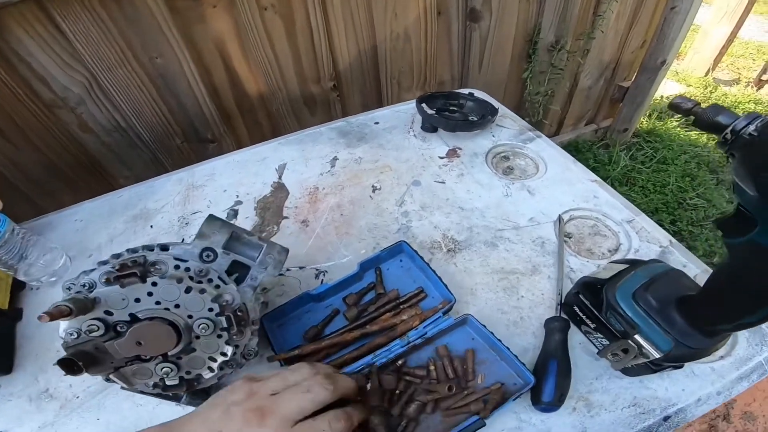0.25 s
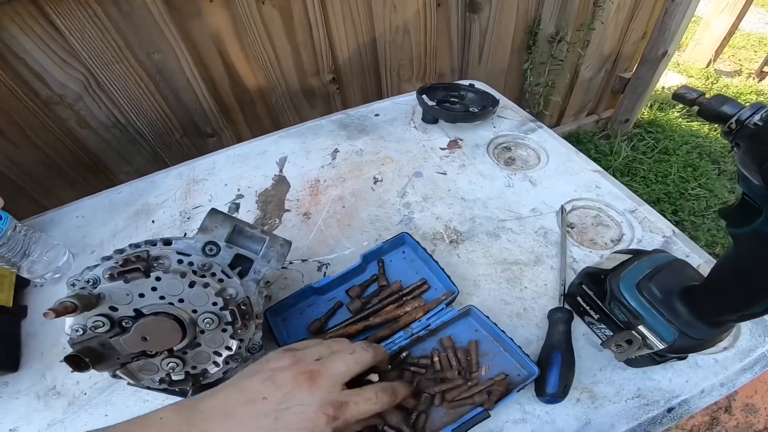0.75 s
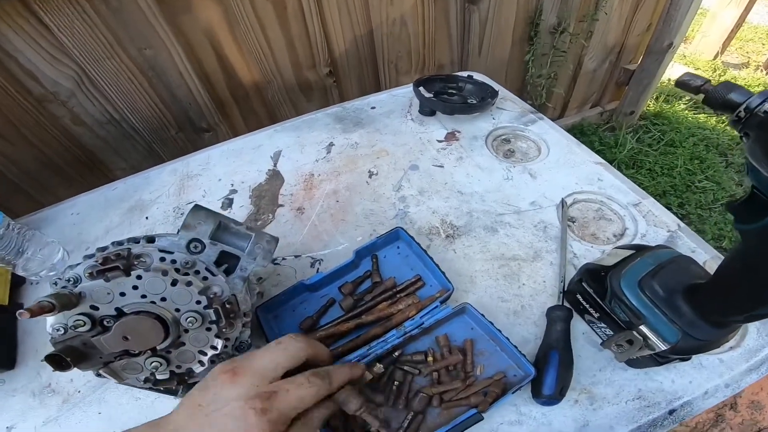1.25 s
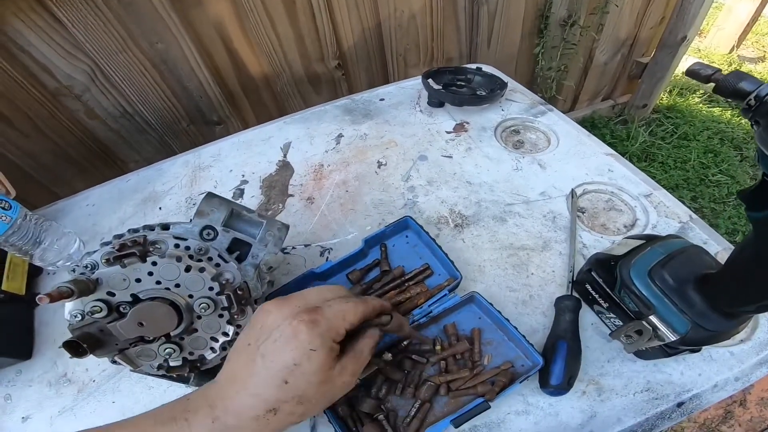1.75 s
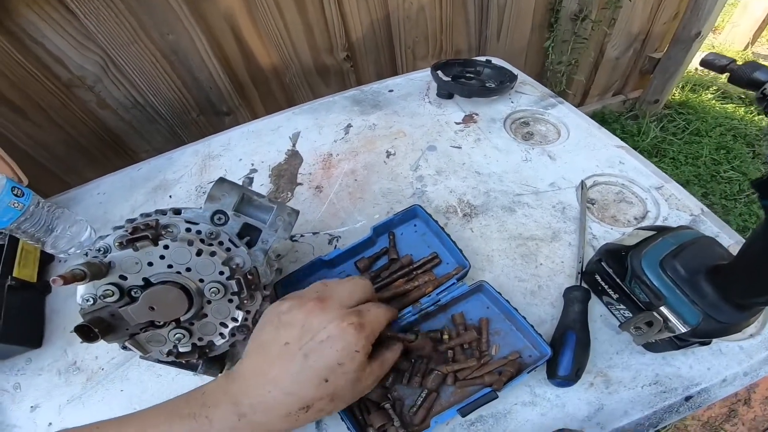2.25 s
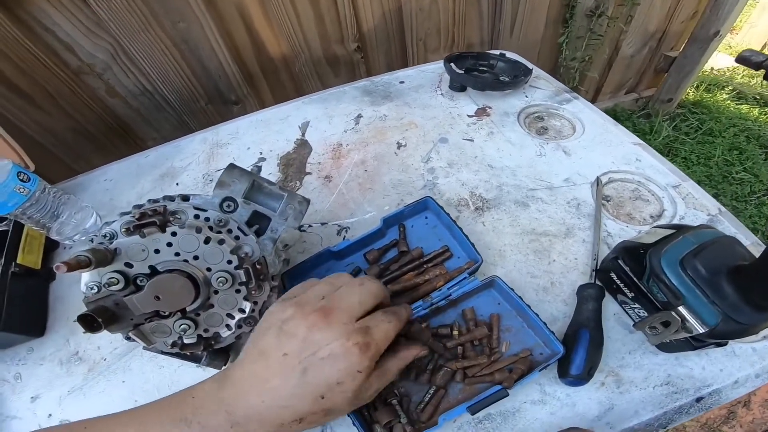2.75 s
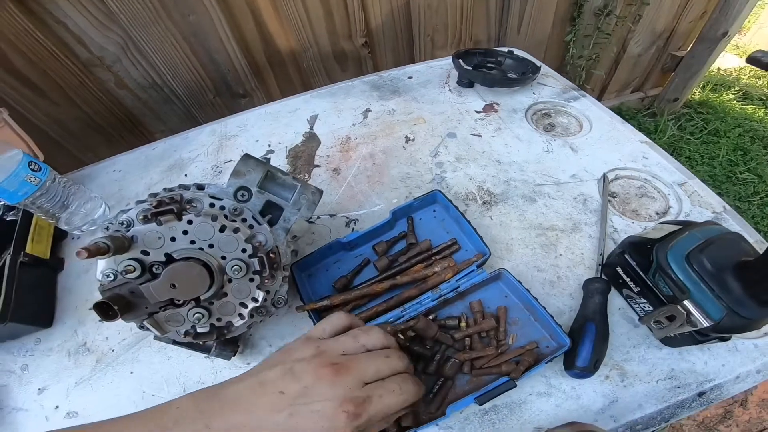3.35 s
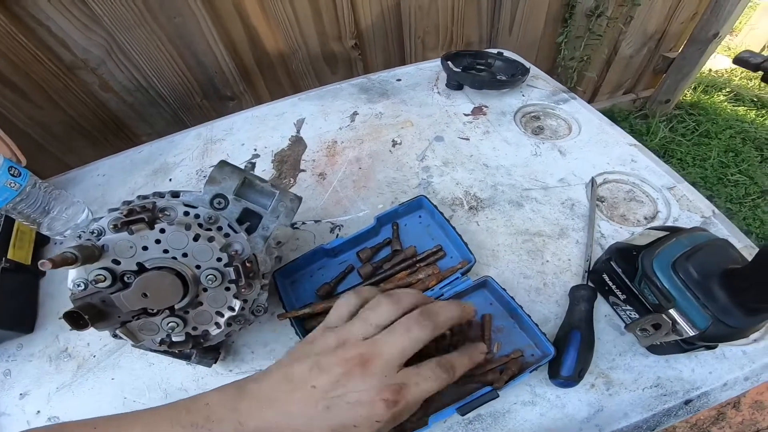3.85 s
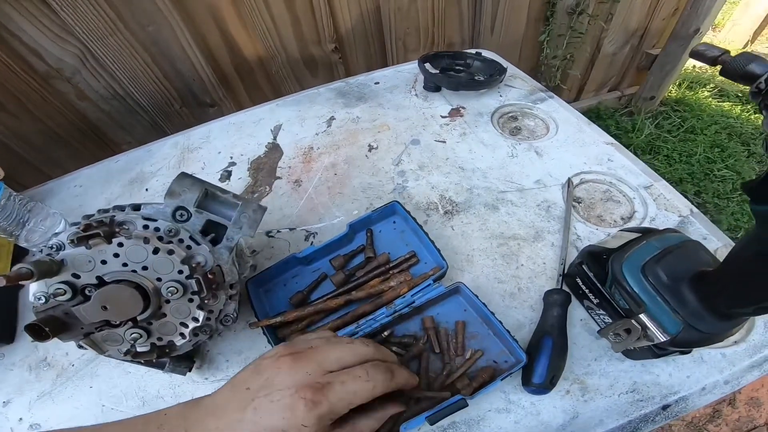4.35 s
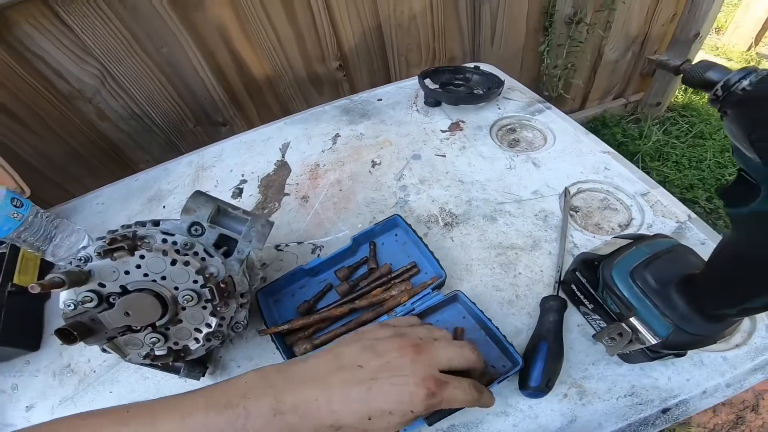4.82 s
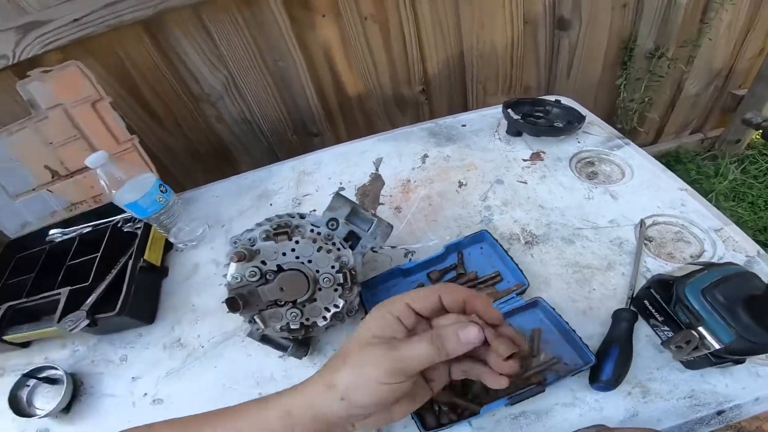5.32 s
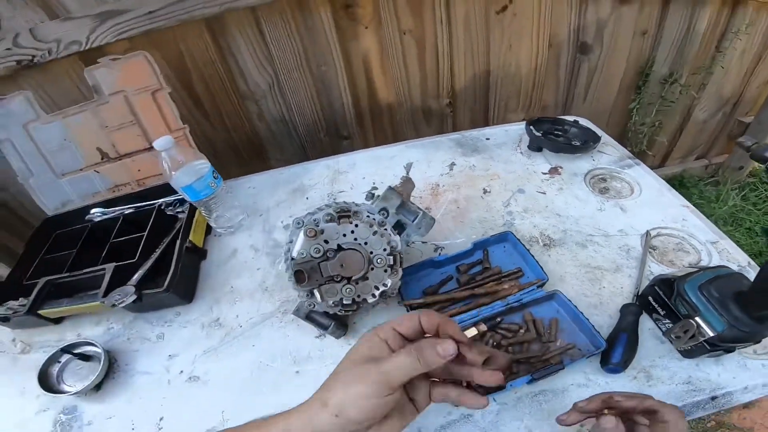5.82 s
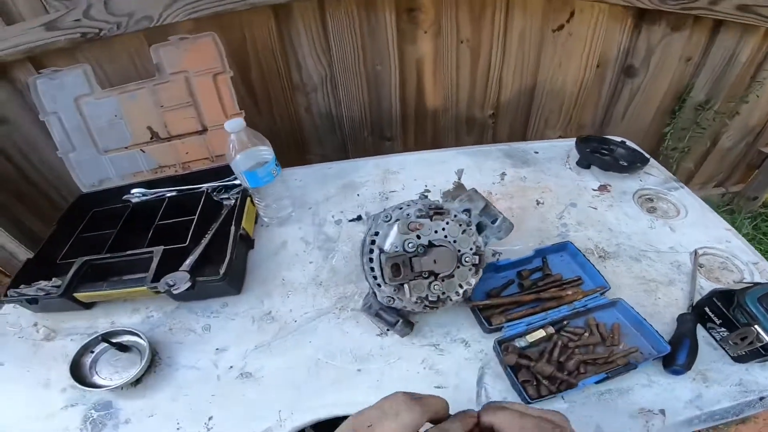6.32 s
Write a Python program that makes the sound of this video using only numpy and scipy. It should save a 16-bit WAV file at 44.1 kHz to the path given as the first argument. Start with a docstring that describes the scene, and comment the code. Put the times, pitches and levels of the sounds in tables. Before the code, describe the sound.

Small metal bits clatter and slide around in a plastic box on an outdoor table as someone sorts through them close by. The clinking comes in busy clusters, thins briefly, then picks up again before stopping. Meanwhile a far-off propeller aircraft swells from a faint hum to a steady, slowly falling drone with a low rumble. Thin, very high insect chirps repeat quietly behind it all.

```python
"""Loose steel bits knock, scrape and ping as a hand rummages in a plastic case on a garden table.
Impacts and friction excite the resonances of case and table, and struck bits ring in their own modes.
A propeller aircraft drones past, its note sinking. An insect buzzes in short chirps of wing strokes.
A distant rumble and rush of air swell and brighten as the aircraft nears."""
import sys
import numpy as np
from scipy import signal
from scipy.fft import rfft, irfft, next_fast_len
from scipy.io import wavfile
from scipy.ndimage import uniform_filter1d, map_coordinates

SR = 44100
rng = np.random.default_rng(int(sys.argv[2]) if len(sys.argv) > 2 else 0)


def put_to_file(sound):
    """Save the sound as 16-bit audio at rate SR, in the file named by the first command-line argument."""
    columns = np.atleast_2d(sound).T  # one column per channel
    safe = np.clip(columns, -1, 1)
    whole_steps = np.round(safe * 32767)
    wavfile.write(sys.argv[1], SR, whole_steps.astype(np.int16))


N = 290001

# Blows on the case. Each row: start in seconds, level in dB, colour in Hz,
# relative treble in dB, table thud in dB.
KNOCKS = [(.0034, -12, 2610, -2, -38), (.0154, -10, 4900, -21, -20), (0.046, -22, 2760, -27.5, -40),
          (0.0727, -21.5, 2280, 8, -40), (0.0825, -11.5, 3430, -23, -16.5), (.0978, -14, 2070, -11, -40),
          (0.1242, -10, 2210, -25, -40), (0.161, -17, 2020, -3, -40), (.186, -24, 2950, -30, -40),
          (.198, -22, 2300, -30, -40), (.2279, -21, 2040, -37.5, -40), (.2443, -23, 1534, -20, -40),
          (0.2519, -10.5, 2200, -3.5, -25), (0.2586, -15, 2810, -23, -40), (0.2715, -12.5, 2170, -15, -40),
          (0.334, -13.5, 3140, -42, -40), (0.3659, -14.5, 2590, -8.5, -43), (.433, -21.5, 3020, -1, -31),
          (0.4736, -10, 2620, -39.5, -36), (0.497, -26, 2060, -35, -40), (.571, -28.5, 2730, -8, -40),
          (.618, -19.5, 1800, -26, -42), (0.6386, -25.5, 1470, -14, -38), (0.6987, -11, 3330, -18, -40),
          (0.7843, -13, 2380, -14, -40), (0.8201, -16, 2940, 5, -22), (.8914, -18, 2960, -0.5, -37),
          (.957, -14, 1690, -4.5, -37), (.9677, -16.5, 2620, -18, -37), (.985, -27, 2300, -8, -40),
          (1.0031, -12, 2270, -40, -40), (1.0584, -24.5, 1420, -37, -40), (1.11, -22, 1480, -14.5, -29),
          (1.1423, -17.5, 2846, -25, -40), (1.1558, -7, 2960, -12.5, -40), (1.2333, -34, 2800, -4, -40),
          (1.3204, -7.5, 3246, -8.5, -16.5), (1.3485, -6.5, 3030, -38.5, -13),
          (1.3901, -18.5, 2130, -22.5, -40), (1.438, -30.5, 4880, 0, -38), (1.463, -26.5, 2100, -34, -40),
          (1.477, -14.5, 1600, -12.5, -40), (1.4943, -11, 2130, -15, -18), (1.5104, -17, 2405, -16.5, -40),
          (1.5453, -9.5, 2210, -21.5, -40), (1.6292, -14.5, 2800, -40, -25), (1.6432, -25, 2880, -42, -38),
          (2.161, -6.5, 2300, -14.5, -14), (2.1985, -20, 2570, -34, -40), (2.282, -38, 3300, -20, -40),
          (2.4593, -16.5, 2600, -30, -40), (2.632, -33, 2190, -30, -38), (2.6826, -19, 4940, -7, -40),
          (2.6931, -9, 2600, -25, -13.5), (2.8582, -29, 1960, -22, -28), (3.013, -35, 2200, -30, -40),
          (3.073, -24, 1620, -29, -40), (3.134, -25, 2500, -12, -40), (3.1596, -19, 2880, -12, -26),
          (3.1665, -16, 3000, -4, -35), (3.264, -22, 2400, -25, -24), (3.2725, -15, 1900, -20, -26),
          (3.345, -29, 2000, -4, -40), (3.3598, -27, 4900, -2.5, -40), (3.3903, -26, 2200, -5, -40),
          (3.438, -21.5, 4600, 1.5, -40), (3.496, -10.5, 2300, -33, -40),
          (3.6425, -13.5, 3420, -32.5, -24.5), (3.664, -25.5, 2000, -25, -40),
          (3.6956, -21.5, 2360, -44, -40), (3.8845, -16.5, 2120, -40, -40), (3.9168, -18.5, 2500, -20, -40),
          (3.933, -27, 3200, -2, -40), (4.008, -16, 1910, -37, -37), (4.0215, -14.5, 2850, -31, -40),
          (4.0475, -24, 3000, 3, -40), (4.0525, -13, 3000, -20, -40), (4.094, -19, 2020, -17, -43),
          (4.1069, -13.5, 3240, -13.5, -40), (4.132, -18, 2730, -10, -40), (4.2555, -13.5, 2820, -5.5, -40),
          (4.285, -31, 2900, -25, -40), (4.361, -21.5, 1510, -35, -40), (4.4287, -30, 1560, -18, -28),
          (4.4636, -30, 1550, -36, -40), (4.5135, -13, 1880, -41, -22), (4.5295, -21.5, 3000, -29, -42),
          (4.5495, -11, 3170, -15.5, -26), (4.626, -27.5, 1450, -8.5, -37), (4.6706, -27, 1360, -37, -42),
          (4.695, -28, 1300, -35, -40), (4.709, -28, 2100, -30, -40), (4.743, -29, 3000, -25, -40),
          (4.791, -13, 2090, -25, -30), (4.798, -15, 2900, -20, -32)]
# Spectra of the case and of steel on steel. Each row: frequency in Hz, relative density in dB.
CASE_SPECTRUM = [(300, -7), (600, -3.5), (1000, -4), (1500, 0), (2400, -3.5), (3100, -1.5), (4100, -6),
                 (5200, -11), (7000, -25), (12000, -41), (16000, -96.5)]
STEEL_SPECTRUM = [(3000, -34.5), (5000, -0.5), (9700, -4.5), (11200, -12.5), (13000, -24), (16000, -50.5)]
def knocks():
    """Impact excitation: a few quick contacts make the case rattle and the steel crack."""
    hard_db, hard_t60_s, skid_s_per_db = -5, .024, .0008  # softer knocks skid longer
    crest_db, snap_db, snap_t60_s = 5, -4, .004
    body, crack = np.zeros((2, 2, N + SR))
    t = np.arange(SR // 12) / SR
    decay = lambda t60: amp(-60 * t / t60) * (1 - np.exp(-t / .00054))
    for start, db, hz, treble_db, _ in KNOCKS:
        t60 = max(hard_t60_s + skid_s_per_db * (hard_db - db), .008)
        chatter = amp(1.6 * rocking(len(t), smoothing=50))
        chatter *= amp(db - crest_db) * np.linalg.norm(decay(t60)) / np.linalg.norm(chatter * decay(t60))
        shake = rng.standard_normal((2, 2, len(t))) * chatter
        envelope = amp(snap_db) * decay(snap_t60_s) + decay(t60) + amp(-19.5) * decay(3.58 * t60)
        add_at(body, start, panel(shake[0] * envelope, hz, width=.25))
        add_at(crack, start, amp(treble_db) * shake[1] * decay(.56 * t60))
    return colour(body[:, :N], CASE_SPECTRUM) + colour(crack[:, :N], STEEL_SPECTRUM)


# Modes of the case walls. Each row: frequency in Hz, bandwidth in Hz, relative gain in dB.
WALL_MODES = [(2010, 120, -6), (2680, 130, -5), (3150, 150, -8), (4450, 110, -2)]
def panel(x, hz, width):
    """Modal response: the touched spot colours the rattle, and each contact wakes the walls unequally."""
    woken = [(centre, band, db + 3 * rng.standard_normal()) for centre, band, db in WALL_MODES]
    walls = lambda f: 1 + sum(modes([mode])(f) for mode in woken)
    spot = modes([(hz, width * hz, 0), (1.5 * hz, width * hz, -6)])
    ring = lambda f: walls(f) * (.85 + spot(f))
    return filtered(x, lambda f: ring(f) / np.sqrt(np.mean(np.abs(ring(f[f < 6000])) ** 2)))


# Drags over the case. Each row: start and end in seconds, level in dB, relative treble in dB.
SCRAPES = [(0, 0.144, -30, -18), (.186, 0.305, -36, -30), (.561, 0.622, -35.5, -23),
           (0.645, 0.856, -34.5, -20.5), (.853, 0.955, -35.5, -27), (0.948, 1.093, -42.5, -29),
           (1.34, 1.461, -44, -24), (1.497, 1.582, -42, -23), (2.375, 2.451, -39, -11),
           (2.58, 2.62, -43, -12), (2.81, 2.87, -49, -15), (3.09, 3.18, -38, -18), (3.22, 3.317, -44, -21),
           (3.325, 3.475, -39, -16), (3.88, 3.956, -41, -12), (3.945, 4.053, -26.5, -15),
           (4.174, 4.251, -46, -20), (4.615, 4.78, -40.5, -28)]
def scrapes():
    """Sliding friction: bits cross ribs and each other in clumps of tiny contacts of random size."""
    contacts_per_s, slide_power = 650, .12
    contacts = rng.random(N) < contacts_per_s / SR
    sizes = np.minimum(rng.exponential(size=N), 2.6)
    ticks = contacts * amp(3.4 * sizes + 1.3 * wobble(50))
    grain = unit(np.sqrt(signal.lfilter([1], [1, -.97], ticks ** 2) + slide_power))
    shake = grain * rng.standard_normal((2, 2, N))
    body, crack = np.zeros((2, 2, N))
    for start, end, db, treble_db in SCRAPES:
        part = slice(round(start * SR), round(end * SR))
        stroke = amp(db) * signal.windows.tukey(part.stop - part.start, .4)
        colour_hz = 3000 + 47 * treble_db  # duller as the treble share falls
        body[:, part] += panel(stroke * shake[0][:, part], colour_hz, width=.51)
        crack[:, part] += amp(treble_db) * stroke * shake[1][:, part]
    table_hum = amp(13) * filtered(body[0], modes(TABLE_MODES))
    return colour(body, CASE_SPECTRUM) + colour(crack, STEEL_SPECTRUM) + table_hum * [[1], [0]]


# Modes of table and case floor. Each row: frequency in Hz, bandwidth in Hz, relative gain in dB.
TABLE_MODES = [(76, 37, 0.5), (162, 71, 2), (233, 60, 1.5), (303.4, 50, 5.5), (480, 150, -7)]
def thumps():
    """Impulse response: each knock pushes case floor and table, then the case settles in small jolts."""
    settle_db, settle_t60_s = -30, .07
    blows, t = np.zeros(N + SR), np.arange(SR // 16) / SR
    for start, *_, thud_db in KNOCKS:
        jolts = amp(settle_db - 60 * t / settle_t60_s) * rng.standard_normal(len(t))
        add_at(blows, start, amp(thud_db) * (signal.unit_impulse(len(t)) + jolts))
    thud = lambda f: modes(TABLE_MODES)(f) / (1 + 1j * f / 900) ** 2
    peak = np.abs(filtered(signal.unit_impulse(SR), thud)).max()
    return filtered(blows[:N], thud) / peak


# Ringing bits. Each row: start in seconds, level in dB, name of the bit, 60 dB decay time in seconds.
PINGS = [(.008, -27.5, "worn", .16), (.076, -26, "long", .12), (.162, -47.5, "thin", .13),
         (.162, -41, "short", .1), (.252, -24.5, "short", .16), (.28, -27.5, "short", .1),
         (.41, -44, "long", .045), (.571, -38, "long", .06), (0.638, -37.5, "long", .08),
         (.89, -33.5, "long", 0.066), (.899, -43, "short", .13), (.965, -40.5, "short", .14),
         (.96, -45.5, "thin", .06), (1.11, -28.5, "long", .042), (1.111, -37.5, "stout", .1),
         (1.235, -38.5, "long", .18), (1.321, -30, "long", .08), (1.39, -38, "long", .047),
         (1.438, -35, "long", .066), (1.438, -44, "stout", .11), (1.46, -38, "long", .043),
         (1.492, -48, "short", .3), (2.683, -44, "short", .13), (3.361, -30, "long", .05),
         (3.362, -26, "stout", .041), (3.439, -28.5, "long", .054), (3.439, -22, "stout", .045),
         (3.44, -49.5, "thin", .09), (3.644, -23, "long", .08), (4.014, -44, "short", .17),
         (4.048, -20.5, "short", .047), (4.06, -43.5, "long", .39), (4.203, -38, "long", .035),
         (4.565, -47, "long", .14), (3.675, -42, "stout", .04)]
# Modes of each named bit. Each row: frequency in Hz, relative level in dB.
BIT_MODES = {"long": [(9396, 0), (14600, -24)], "stout": [(4815, 0)], "short": [(11967, 0), (12105, -10)],
             "thin": [(15237, 0)], "worn": [(11661, 0), (12333, -4)]}
def pings():
    """Damped free vibration: struck bits ring on, roughened and damped by what they touch."""
    out, t = np.zeros((2, N + SR)), np.arange(SR // 3) / SR
    for start, db, bit, t60 in PINGS:
        for hz, mode_db in BIT_MODES[bit]:
            phase = rng.uniform(0, 2 * np.pi, (2, 1)) + np.cumsum(rng.normal(0, .055, len(t)))
            rough_db = 3.5 * rocking(len(t), smoothing=300)
            envelope = amp(db + mode_db + rough_db - 60 * t / t60) * (1 - np.exp(-t / .0003))
            add_at(out, start, envelope * np.sin(2 * np.pi * hz * t + phase))
    return out[:, :N] * amp([[-5], [2]])


# Pitch of the propeller. Each row: time in seconds, blade note in Hz.
BLADE_PITCH = [(0, 112.4), (2, 110.7), (3.9, 108), (4.9, 105.2), (5.7, 99.67), (6.58, 93.65)]
# Strength of the blade note and of its octave. Each row: time in seconds, level in dB.
NOTE_LEVEL = [(0, -52), (.5, -47), (1.3, -38), (1.7, -39.5), (2.2, -30.5), (2.65, -26), (2.8, -30),
              (3.5, -23.5), (3.8, -17), (4.05, -19.5), (4.25, -24), (4.6, -30.5), (4.82, -19.5), (5.1, -20),
              (5.35, -13), (5.7, -17), (6.3, -18.5), (6.58, -20.5)]
OCTAVE_LEVEL = [(0, -57), (3, -51.5), (4.2, -42.5), (5, -33.5), (5.5, -41), (6.2, -31.5), (6.58, -37.5)]
def aircraft():
    """Amplitude and phase modulation: the blade note and its octave flutter in turbulent air."""
    phase = 2 * np.pi * np.cumsum(curves(BLADE_PITCH)[0]) / SR + .12 * wobble(12)
    note = amp(curves(NOTE_LEVEL)[0] + wobble(13)) * np.sin(phase)
    octave = amp(curves(OCTAVE_LEVEL)[0] + 2.43 * wobble(14)) * np.sin(2 * phase + .65 * wobble(15))
    return np.sqrt(2) * (note + octave) * amp([[-.3], [.3]])


# The insect's chirps. Each entry: start in seconds.
CHIRPS = [.3, .5, 1.19, 1.4, 1.989, 2.335, 2.53, 2.73, 2.955, 3.36, 3.555, 3.735, 4.13, 4.335, 4.529, 4.725,
          4.9, 5.089, 5.285, 5.5, 5.74, 5.96, 6.176, 6.365]
# Wing resonances, each applied twice. Each row: frequency in Hz, bandwidth in Hz, gain per pass in dB.
WING_MODES = [(10120, 370, -2.5), (13800, 250, -9)]
def insect():
    """Pulsed excitation: each chirp is a short swell of wing strokes driving two narrow resonances."""
    strokes_per_s, chirp_s = 150, .042
    strokes, t = np.zeros(N + SR), np.arange(round(chirp_s * SR)) / SR
    swell = np.sin(np.pi * t / t[-1]) ** .37 * np.sin(np.pi * strokes_per_s * t) ** 2
    for start in CHIRPS:
        add_at(strokes, start, amp(-36.5) * swell * rng.standard_normal(len(t)))
    wings = lambda f: sum(modes([band])(f) ** 2 for band in WING_MODES)
    return filtered(strokes[:N], wings) * amp([[-2.5], [2]])


# Swell of the distant rush. Each row: time in seconds, rumble in dB, hiss in dB.
RUSH_LEVELS = [(0, -40, -35.5), (.6, -45, -47), (1.4, -41, -50), (3, -37.5, -43), (4.8, -31, -38),
               (6.58, -32, -40)]
# Spectra of rumble and hiss. Each row: frequency in Hz, relative density in dB.
RUMBLE_SPECTRUM = [(20, -38.5), (48, -4), (100, 1), (150, -10.5), (250, -14.5), (400, -60), (800, -120)]
HISS_SPECTRUM = [(180, -4.5), (300, -2.5), (430, -5.5), (1120, -7.5), (3300, -25), (6500, -35), (8800, -39),
                 (10300, -36.5), (11500, -75)]
# Width of the rush. Each row: frequency in Hz, left-right coherence.
RUSH_COHERENCE = [(200, 0.99), (640, 0.72), (1400, 0.007), (3100, 0.52), (7000, 0.021)]
# Its balance. Each row: frequency in Hz, left over right in dB.
RUSH_PAN = [(100, -.6), (800, -1.5), (8000, -1)]
def distant_rush():
    """Broadband noise: a rumble and a rush of air swell and brighten as the aircraft nears."""
    treble_hz, treble_db_per_db, neutral_db = 3500, .4, -38
    rumble_db, hiss_db = curves(RUSH_LEVELS)
    rumble = amp(rumble_db + 2.43 * wobble(9)) * colour(rng.standard_normal((2, N)), RUMBLE_SPECTRUM)
    hiss = amp(hiss_db + .41 * wobble(4.01)) * colour(rng.standard_normal((2, N)), HISS_SPECTRUM)
    treble = filtered(hiss, lambda hz: 1 / (1 + (treble_hz / (hz + 1)) ** 2))
    treble_gain = amp(treble_db_per_db * (hiss_db - neutral_db))
    return spread(rumble + hiss + treble * (treble_gain - 1), RUSH_COHERENCE, RUSH_PAN)


def amp(db):
    """Decibels as an amplitude ratio."""
    return 10 ** (np.asarray(db) / 20)


def unit(x):
    """Normalisation to an rms of 1."""
    return x / np.sqrt(np.mean(x ** 2) + 1e-20)


def add_at(track, start_s, sound):
    """Superposition of a sound on a track."""
    track[..., round(start_s * SR):][..., :sound.shape[-1]] += sound


def along(points, hz):
    """Interpolation of (Hz, value) points on a log axis."""
    f, values = np.transpose(points)
    return np.interp(np.log(hz + 1), np.log(f + 1), values)


def curves(rows):
    """Linear interpolation, per sample, of each column after the time."""
    times, *columns = np.transpose(rows)
    return [np.interp(np.arange(N) / SR, times, column) for column in columns]


def wobble(rate):
    """Smooth random modulation, rate knots a second."""
    return map_coordinates(rng.standard_normal(int(N * rate / SR) + 4), [np.arange(N) * rate / SR])


def rocking(n, smoothing):
    """A moving average of noise: the irregular rocking of a bit."""
    return unit(uniform_filter1d(rng.standard_normal(n), size=smoothing))


def filtered(x, response):
    """Linear filtering by a complex frequency response."""
    size = next_fast_len(x.shape[-1] + 4096)
    return irfft(rfft(x, size) * response(np.fft.rfftfreq(size, 1 / SR)), size)[..., :x.shape[-1]]


def modes(table):
    """Causal response of (Hz, bandwidth, dB) resonances, summed with alternating sign."""
    return lambda f: sum((-1) ** k * amp(db) * 1j * f * band / (hz * hz - f * f + 1j * f * band)
                         for k, (hz, band, db) in enumerate(table))


def colour(x, spectrum):
    """Spectral shaping that keeps the level of white noise."""
    return filtered(x, lambda hz: unit(amp(along(spectrum, hz))))


def spread(pair, coherence, pan):
    """Mid-side mixing: two unrelated sounds become left and right of given coherence and balance."""
    angle = lambda hz: np.arccos(np.clip(along(coherence, hz), -1, 1)) / 2
    mid, side = filtered(pair, lambda hz: np.array([np.cos(angle(hz)), np.sin(angle(hz))]))
    return filtered(np.array([mid + side, mid - side]), lambda hz: amp(along(pan, hz) / [[2], [-2]]))


# Width of the case's sound. Each row: frequency in Hz, left-right coherence.
CASE_COHERENCE = [(200, 0.94), (400, 0.94), (800, 0.2), (2500, 0.79), (8000, 0.16)]
# Its balance. Each row: frequency in Hz, left over right in dB.
CASE_PAN = [(300, 1), (950, -5.5), (3700, -2.5), (12000, -7)]
def scene():
    """Superposition of the near rummaging and the outdoor background."""
    rummaging = spread(knocks() + scrapes(), CASE_COHERENCE, CASE_PAN) + thumps() + pings()
    return rummaging + aircraft() + distant_rush() + insect()


def record(dry):
    """Band limiting: an ideal low-pass filter removes the highest treble."""
    top_hz = 16494
    return filtered(dry, lambda hz: hz < top_hz)


dry = scene()
out = record(dry)
put_to_file(out)
```